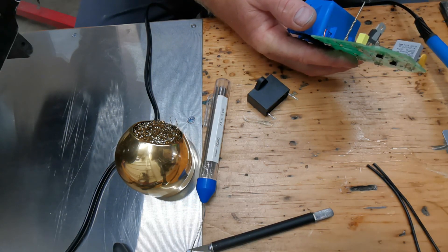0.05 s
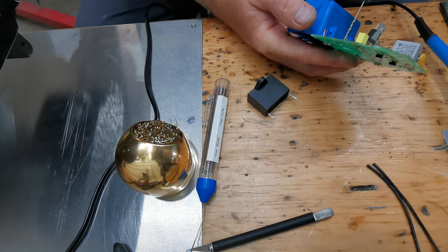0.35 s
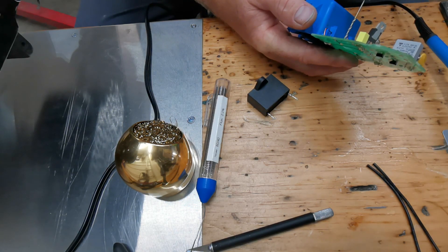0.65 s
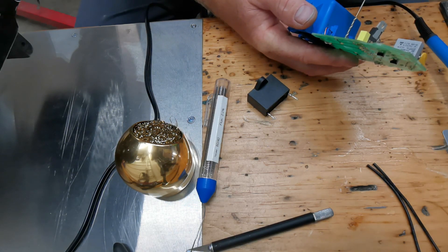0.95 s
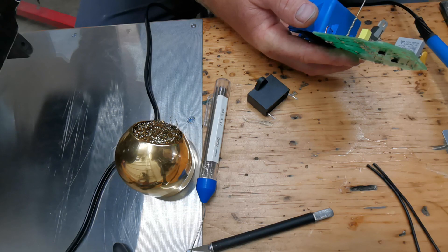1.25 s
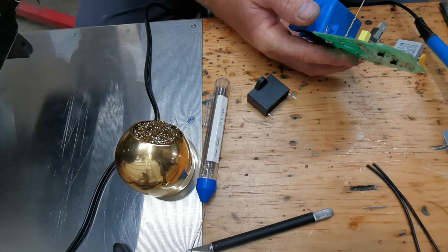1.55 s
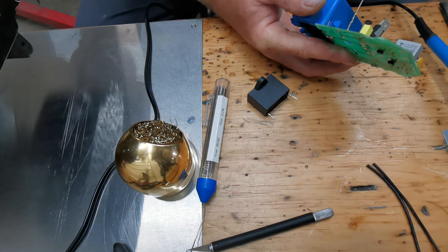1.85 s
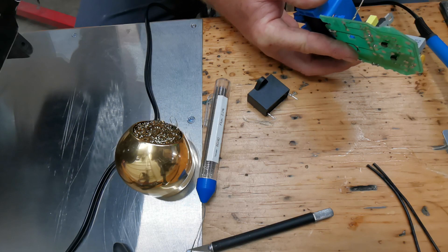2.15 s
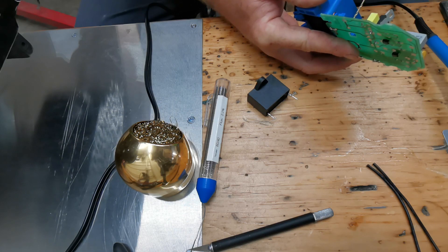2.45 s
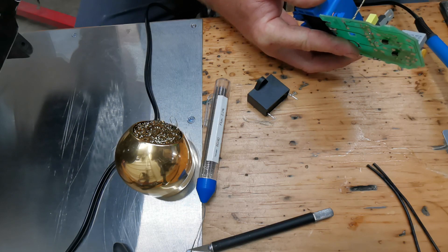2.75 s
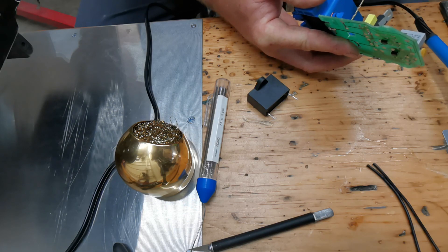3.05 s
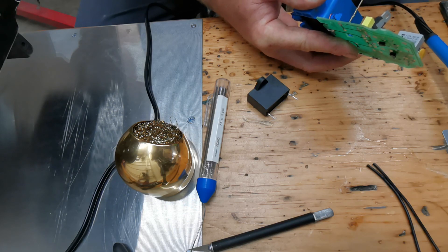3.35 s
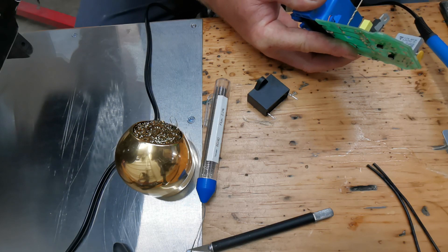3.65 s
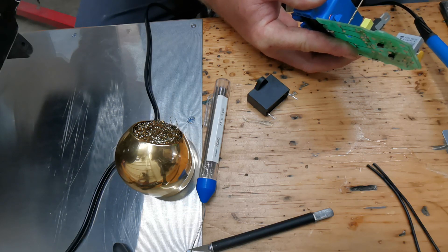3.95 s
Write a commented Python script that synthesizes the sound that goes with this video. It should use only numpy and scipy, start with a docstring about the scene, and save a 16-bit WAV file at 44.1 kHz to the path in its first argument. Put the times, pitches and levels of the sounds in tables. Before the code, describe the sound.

Desoldering gun's suction pump spins up, whirring and hissing, after small scrapes and a trigger click.

```python
"""At a workbench: desoldering over a transformer's hum. The nozzle scrapes a circuit board and a pin
squeaks in it by stick-slip. The trigger snaps, air hisses in and the vacuum pump climbs in steps to
full speed. The nozzle slurps, whistles and spits solder at first; then the pump's whirr and exhaust
take over. Air noise puffs once per stroke; drone and whine are multiples of the stroke rate."""
import sys
import numpy as np
from scipy import signal
from scipy.fft import rfft, irfft
from scipy.io import wavfile

SR = 44100
rng = np.random.default_rng(int(sys.argv[2]) if len(sys.argv) > 2 else 0)


def inscribe(sig):
    """Save sig as 16-bit PCM at rate SR to the path in sys.argv[1].

    A 1-D sig is mono; a 2-D sig holds one channel per row.
    Samples are clipped to [-1, 1] before scaling.
    """
    pcm = np.round(np.clip(np.atleast_2d(sig).T, -1, 1) * 32767)
    wavfile.write(sys.argv[1], SR, pcm.astype(np.int16))


N = 176400
T = np.arange(N) / SR
HZ = np.fft.rfftfreq(N, 1 / SR)
AIR_ON = T > 2.085
LEFT_LAG_S = .00017

# pump speed: t/s, stroke rate/Hz
STROKE_RATE = [(2.1, 80), (2.2, 88), (2.5, 90), (2.58, 95.5), (2.68, 128.5), (2.825, 131), (2.876, 177.5),
               (2.94, 180), (3.06, 175), (3.116, 208), (3.17, 219), (3.25, 223.9), (4.0, 223.8)]
# air leaving the pump: t/s, level/dB
EXHAUST_LEVEL = [(2.1, -65), (2.85, -48.5), (3.15, -42), (3.45, -38), (3.85, -37.5), (4.0, -38)]
# nozzle air spectrum: f/Hz, density/dB
NOZZLE_SPECTRUM = [(200, -31), (330, -20), (400, -7.5), (680, -13), (850, -3), (1400, -6), (1880, -5.5),
                   (2150, 1), (3000, -1.5), (4300, -9), (5600, -7), (6400, -10), (7900, -5.5),
                   (8700, -14.5), (10200, -18), (10900, -27.5), (13000, -23), (15000, -30)]
# tool noise: f/Hz, L-R correlation
TOOL_CORRELATION = [(300, 0.96), (700, 1), (2500, 0.39), (12000, 0.19)]


def pump():
    """One stroke rate drives the puffs of suction and exhaust, the drone and the whine under load."""
    suction_level = [(2.085, -53.5), (2.102, -48), (2.17, -43.5), (2.26, -47), (2.5, -45.5), (2.635, -45),
                     (2.695, -40.5), (2.77, -41.5), (2.81, -44.5), (2.87, -40), (2.99, -39.5), (3.1, -40),
                     (3.22, -46.5), (4.0, -45.5)]  # air through the nozzle: t/s, level/dB
    # peaks in the hiss; the one near 7.9 kHz is microphone colour
    suction_peaks = [(900, 39, 9.5), (1360, 280, 5.5), (2360, 160, 3), (4670, 200, 10.5), (7830, 160, 3.5)]  # f/Hz, width/Hz, lift/dB
    exhaust_peaks = [(1136, 43, 7.4), (4790, 180, 10), (7950, 400, 2.8)]  # f/Hz, width/Hz, lift/dB
    suction_pan = [(500, -4.5), (1400, 1), (5000, 1)]  # balance: f/Hz, L-R/dB
    exhaust_pan = [(500, -16.5), (1300, 0), (2800, -4.5), (12000, -1.5)]  # balance: f/Hz, L-R/dB
    exhaust_spectrum = [(250, -40), (400, -34), (630, -19.5), (740, -9.5), (1130, -11.5), (1900, -9.5),
                        (2080, -6), (3100, -4), (4400, -11), (5650, -6.5), (6500, -14.5), (7800, -7),
                        (8800, -20), (10300, -21.5), (10900, -40), (11700, -25.5), (15000, -31.5)]  # f/Hz, density/dB
    drone_level = [(2.1, -73), (2.3, -68), (2.5, -67), (2.62, -73), (2.8, -61.5), (2.95, -60), (3.08, -62),
                   (3.25, -58), (3.9, -55)]  # t/s, level/dB
    whine_orders = [(2, -28.5), (9, -17), (10, -24), (11, -17), (13, -12), (14, -15), (16, -22)]  # multiple of the stroke rate, level/dB re load_db
    full_load_db, whine_growth = -36, 3.2  # growth: dB of whine per dB of exhaust
    strokes = np.cumsum(curve(STROKE_RATE) * (1 + 0.0005 * drift(22))) / SR
    exhaust_db = curve(EXHAUST_LEVEL)
    suction = airflow(strokes, NOZZLE_SPECTRUM, suction_peaks, suction_pan,
                      puff_depth=0.17, flutter_db=1.4, flutter_hz=59)
    exhaust = airflow(strokes, exhaust_spectrum, exhaust_peaks, exhaust_pan,
                      puff_depth=0.061, flutter_db=1.0, flutter_hz=40)
    hiss = amp(curve(suction_level)) * suction + amp(exhaust_db) * exhaust
    load_db = full_load_db + whine_growth * (exhaust_db - full_load_db)
    drone = pump_tone(strokes, 3, curve(drone_level), pan_db=-2, flutter_db=-0.1)
    whine = sum(pump_tone(strokes, round(order), db + load_db, pan_db=-14.5, flutter_db=3)
                for order, db in whine_orders)
    return (hiss + drone + whine) * AIR_ON + amp(-11) * room(hiss * AIR_ON)


def airflow(strokes, colour, peaks, balance, puff_depth, flutter_db, flutter_hz):
    """Turbulence, puffed once per stroke, with steady spectral peaks; rms 1."""
    puffs = 1 + puff_depth * np.cos(2 * np.pi * strokes)
    noise = noise_spectra(puffs * amp(flutter_db * drift(flutter_hz)))
    return unit(irfft(noise * amp(spectrum(colour) + lifts_db(peaks)) * pan(spectrum(balance)), N))


def pump_tone(strokes, order, db, pan_db, flutter_db):
    """One fluttering multiple of the stroke rate."""
    stereo_strokes = np.array([np.interp(T - LEFT_LAG_S, T, strokes), strokes])
    envelope = np.sqrt(2) * amp(db + flutter_db * drift(11))
    return envelope * np.sin(2 * np.pi * (order * stereo_strokes + rng.random())) * pan(pan_db)


def hose():
    """Hollow pipe resonances, blown harder as the exhaust grows."""
    modes = [(1538, 170, -13), (2223, 120, -9.5)]  # f/Hz, width/Hz, level/dB re exhaust
    ring = sum(amp(db) * noise_band(hz, width_hz) for hz, width_hz, db in modes)
    return amp(curve(EXHAUST_LEVEL)) * AIR_ON * ring


def high_whistle(base_hz=4630, width_hz=240):
    """The nozzle's breathy whistle, sharpening a little as the pump speeds up."""
    level = [(2.4, -65), (2.64, -58), (2.69, -47.5), (2.88, -52), (2.99, -43), (3.12, -52), (3.5, -51),
             (4.0, -52)]  # t/s, level/dB
    band = irfft(noise_spectra() / (1 + (2 * (HZ - base_hz) / width_hz) ** 4), N)
    shift_hz = 0.8 * curve(STROKE_RATE)
    glide = np.exp(2j * np.pi * np.cumsum(shift_hz) / SR)
    return amp(curve(level)) * AIR_ON * unit((signal.hilbert(band) * glide).real)


def low_whistles(fade_s=0.028):
    """Narrow, breathy resonances of the air in the nozzle come and go."""
    notes = [(2.107, 2.64, 598, 54.5, -64), (2.68, 3.033, 820, 82, -60)]  # start/s, end/s, f/Hz, width/Hz, level/dB
    out = np.zeros((2, N))
    for start_s, end_s, hz, width_hz, db in notes:
        gate = np.clip(np.minimum(T - start_s, end_s - T) / fade_s, 0, 1)
        out += amp(db) * gate * noise_band(hz, width_hz)
    return out


def spits():
    """Short swells of hiss as drops of solder go up the nozzle."""
    drops = [(2.754, 0.019, -43, 3500), (2.835, 0.019, -39.5, 750), (2.837, 0.022, -38, 2900)]  # t/s, length/s, level/dB, centre/Hz
    out = np.zeros((2, N))
    for start_s, length_s, db, centre_hz in drops:
        swell = np.sin(np.pi * np.clip((T - start_s) / length_s, 0, 1))
        colour = unit(amp(spectrum(NOZZLE_SPECTRUM)) / (1 + np.log2((HZ + 1) / centre_hz) ** 2))
        out += amp(db) * irfft(noise_spectra(swell) * colour, N)
    return out


def trigger():
    """The plastic trigger takes up its slack, snaps over and settles."""
    snaps = [(2.086, -52.5, .0005, 0.0052, 9000), (2.1002, -43, 0.00054, 0.0088, 10000),
             (2.1111, -27, 0.0013, 0.0041, 4440), (2.1214, -20, 0.00036, 0.0045, 12000),
             (2.126, -31, 0.00099, 0.0096, 8050), (2.16, -36, 0.0009, 0.0069, 7000)]  # t/s, level/dB, rise/s, decay/s, low-pass/Hz
    snap_spectrum = [(120, -70), (200, -26), (590, -33), (749, -7), (1180, -16.5), (1480, -1), (1740, -9),
                     (3020, -3.5), (3690, -10.5), (4770, -2.5), (6760, -12.5), (7970, 0), (11900, -26.5),
                     (14600, -12), (16000, -33)]  # f/Hz, density/dB
    out = np.zeros((2, N))
    for start_s, db, rise_s, decay_s, cutoff_hz in snaps:
        t = np.maximum(T - start_s, 0)
        envelope = np.minimum(t / rise_s, 1) * np.exp(-(np.maximum(t - rise_s, 0) / decay_s) ** 2)
        colour = unit(amp(spectrum(snap_spectrum)) / np.sqrt(1 + (HZ / cutoff_hz) ** 4))
        out += amp(db) * irfft(noise_spectra(envelope) * colour, N)
    return out


def scrapes(t60_at_1khz_s=.05, grip_detune=0.018, rasp_db=-10):
    """Each scrape is a burst of tiny slips that rings the gun's tube and the parts it scrapes."""
    contacts = [(0.0, 0.02, -46, 6500), (0.0739, 0.01, -44, 7440), (0.085, 0.011, -47, 6950),
                (0.1443, 0.0045, -38, 11900), (0.153, 0.019, -46.5, 8900), (0.17, 0.0045, -43.5, 5960),
                (0.1983, 0.0047, -41, 7200), (0.54, 0.0081, -59.5, 6700), (0.629, 0.018, -70, 7550),
                (1.191, 0.023, -63.5, 1690), (1.267, 0.023, -60.5, 7850), (1.387, 0.037, -67, 2200),
                (1.3889, 0.0084, -44, 9000), (1.441, 0.0095, -62, 4000), (1.454, 0.028, -59.5, 9200),
                (1.477, 0.025, -55.5, 8100), (1.523, 0.022, -68, 3500)]  # t/s, length/s, level/dB, low-pass/Hz
    scrape_modes = [(748, -1), (1020, -13), (1420, 0), (1505, 0), (2136, 0), (2550, -4), (3320, 6),
                    (4850, 7), (5530, 6), (6250, 3), (7700, 2), (12300, -5)]  # f/Hz, relative level/dB
    out, t = np.zeros((2, N)), T[:SR // 8]
    for start_s, length_s, db, cutoff_hz in contacts:
        slips = rng.standard_normal(len(t)) * amp(2 * rng.standard_normal(len(t)))
        slips *= np.sin(np.pi * np.minimum(t / length_s, 1) ** 0.4)
        ring = np.zeros((2, len(t)))
        for hz, mode_db in scrape_modes:
            decay_db = 60 * t / t60_at_1khz_s * (hz / 1000) ** .45  # higher modes die sooner
            detuned_hz = hz * (1 + grip_detune * rng.standard_normal())
            cycles = detuned_hz * t + 0.85 * rng.random((2, 1))
            ring += amp(mode_db - decay_db) * np.sin(2 * np.pi * cycles)
        ringing = signal.fftconvolve(slips[None], ring, axes=1)[:, :len(t)]
        rasp = signal.lfilter(*signal.butter(2, [2000, 8000], "band", fs=SR), slips)
        scrape = unit(ringing) + amp(rasp_db) * unit(rasp)
        scrape = signal.lfilter(*signal.butter(2, cutoff_hz, fs=SR), scrape)  # softer contact: duller
        add(out, start_s, amp(db) * unit(scrape) * np.sqrt(length_s / t[-1]))
    return out


def squeaks(pitch_jitter=0.012):
    """The pin sticks and slips in the nozzle at its own pitch."""
    rubs = [(0.073, 0.032, -44.5, 2064), (0.173, 0.016, -47.5, 2090), (0.193, 0.022, -44, 2064),
            (0.54, 0.027, -52, 2107)]  # t/s, length/s, level/dB, f/Hz
    out = np.zeros(N)
    for start_s, length_s, db, hz in rubs:
        t = np.arange(0, length_s, 1 / SR)
        cycles = np.cumsum(hz * (1 + pitch_jitter * drift(200)[:len(t)])) / SR
        envelope = np.sqrt(2) * amp(db) * np.sin(np.pi * t / length_s) ** 0.84
        add(out, start_s, envelope * np.sin(2 * np.pi * cycles))
    return out


def transformer(hum_hz=120):
    """Hum at harmonics of twice the mains rate."""
    harmonics = [(1, -70.5, 2.5), (2, -64.5, -1.5), (3, -64, 0), (5, -78.5, -2), (6, -85.5, -12),
                 (7, -83, -4.5)]  # multiple of hum_hz, level/dB, L-R/dB
    out, lead_rad = np.zeros((2, N)), np.array([[0], [0.7]])
    for order, db, pan_db in harmonics:
        phase_rad = 2 * np.pi * (round(order) * hum_hz * T + rng.random()) + lead_rad
        out += np.sqrt(2) * amp(db) * pan(pan_db) * np.sin(phase_rad)
    return out


def room_noise(level_db=-66.5):
    """Quiet, steady noise with a few treble peaks."""
    colour = [(70, -6.5), (180, -12.5), (300, -15.5), (600, -20), (1500, -24), (3700, -27), (4500, -31.5),
              (8200, -28.5), (10000, -42.5), (11700, -47), (13000, -57)]  # f/Hz, density/dB
    peaks = [(2870, 44, 12.5), (3330, 170, 7), (6870, 210, 6.5)]  # f/Hz, width/Hz, lift/dB
    correlation = [(240, 0.47), (950, 0.014)]  # f/Hz, L-R correlation
    noise = noise_spectra(1, correlation, lag_s=0)
    return amp(level_db) * unit(irfft(noise * amp(spectrum(colour) + lifts_db(peaks)), N))


def room(x, t60_s=0.27, cutoff_hz=7600):
    """A short, slightly dull workshop tail."""
    t = T[:SR // 2]
    tail = rng.standard_normal((2, len(t))) * amp(-60 * t / t60_s) * (t > .004)
    tail = signal.lfilter(*signal.butter(1, cutoff_hz, fs=SR), tail)
    return signal.fftconvolve(x, tail / np.linalg.norm(tail[0]), axes=1)[:, :N]


def noise_spectra(envelope=1, correlation=TOOL_CORRELATION, lag_s=LEFT_LAG_S):
    """Spectra of two partly correlated noises under one envelope, the left late by lag_s."""
    common, separate = rfft(rng.standard_normal((2, N)) * envelope)
    alike = np.clip(spectrum(correlation), 0, 1)
    left = common * np.exp(-2j * np.pi * HZ * lag_s)
    right = alike * common + np.sqrt(1 - alike ** 2) * separate
    return np.array([left, right])


def noise_band(hz, width_hz):
    """Stereo noise through one resonance; rms 1."""
    return unit(irfft(noise_spectra() * resonance(hz, width_hz), N))


def resonance(hz, width_hz):
    return 1 / (1 + (2 * (HZ - hz) / width_hz) ** 2)


def lifts_db(peaks):
    return sum(db * resonance(hz, width_hz) for hz, width_hz, db in peaks)


def drift(rate_hz):
    """Random wander below rate_hz; rms 1."""
    return unit(irfft(rfft(rng.standard_normal(N)) / (1 + (HZ / rate_hz) ** 4), N))


def spectrum(points):
    """A table on the frequency grid, interpolated in log f."""
    hz, value = np.transpose(points)
    return np.interp(np.log(HZ + 1), np.log(hz + 1), value)


def curve(points):
    return np.interp(T, *np.transpose(points))


def amp(db):
    return 10 ** (np.asarray(db) / 20)


def unit(x):
    return x / np.sqrt(np.mean(x ** 2) + 1e-20)


def pan(db):
    return amp(np.array([np.atleast_1d(db), -np.atleast_1d(db)]) / 2)


def add(mix, start_s, sound):
    part = mix[..., max(round(start_s * SR), 0):][..., :sound.shape[-1]]
    part += sound[..., :part.shape[-1]]


def scene():
    """Handling and trigger with their room, then the pump, its air resonances and the background."""
    handling, snap = scrapes() + squeaks() + spits(), trigger()
    out = handling + snap + room(amp(-15) * handling + amp(-15.5) * snap)
    add(out, .022, amp(-15) * handling)  # wall echo
    return out + pump() + hose() + high_whistle() + low_whistles() + transformer() + room_noise()


def record(dry):
    """Steep low-pass at 15.3 kHz."""
    taps = signal.firwin(511, 15300, window=("kaiser", 9), fs=SR)
    return signal.oaconvolve(dry, taps[None], "same")


dry = scene()
out = record(dry)
inscribe(out)
```